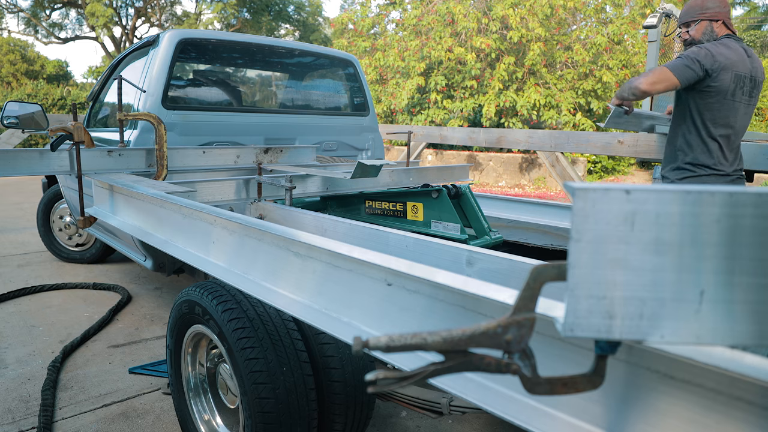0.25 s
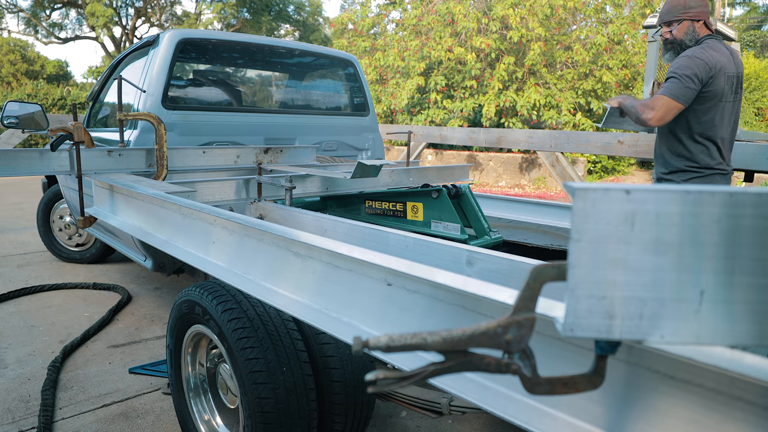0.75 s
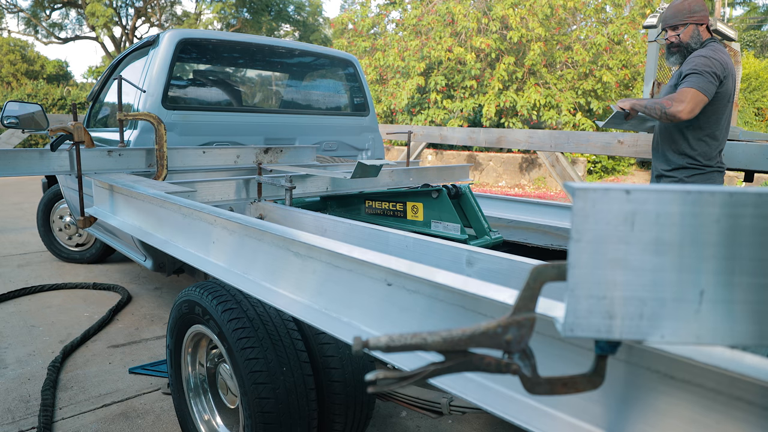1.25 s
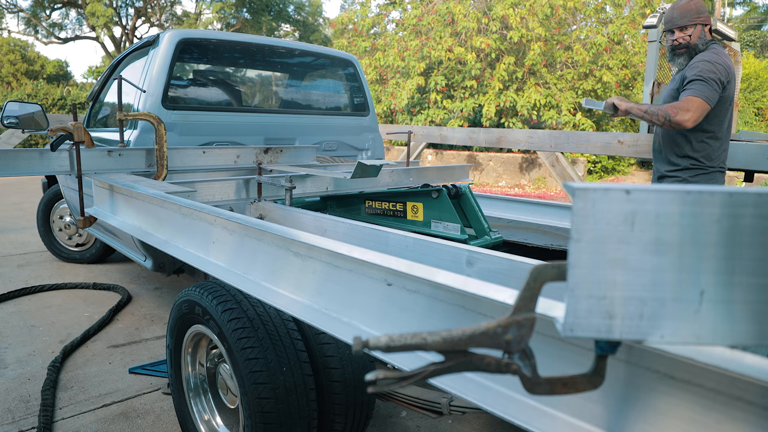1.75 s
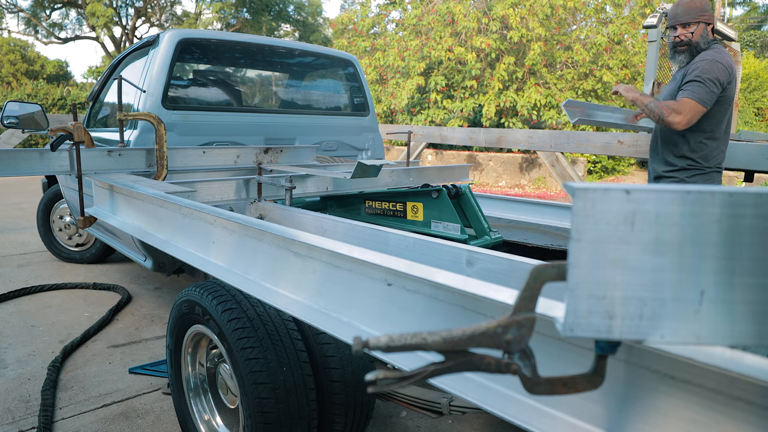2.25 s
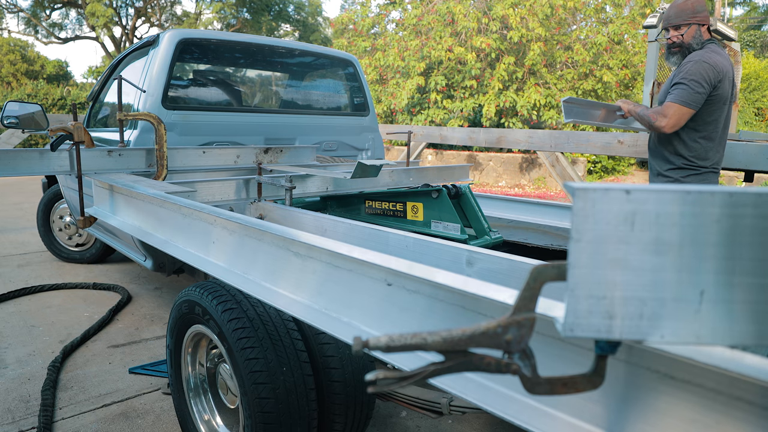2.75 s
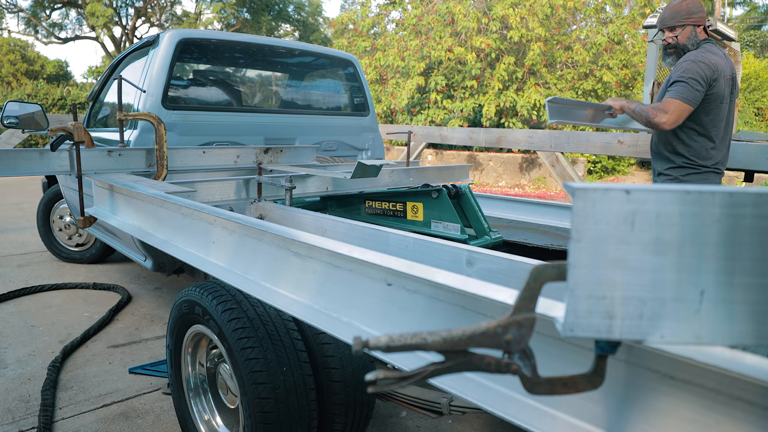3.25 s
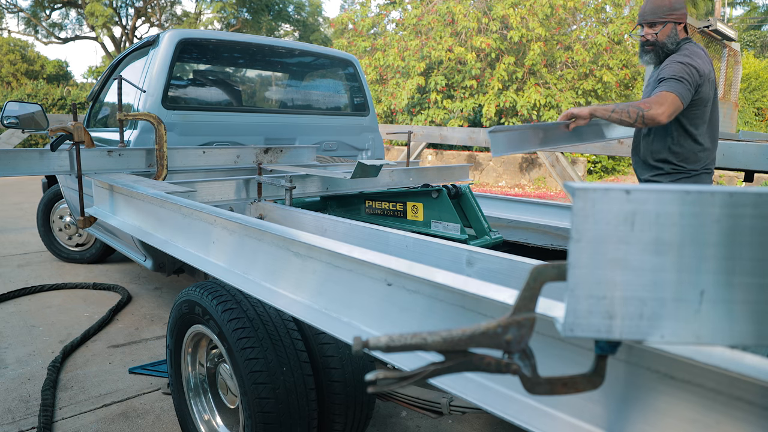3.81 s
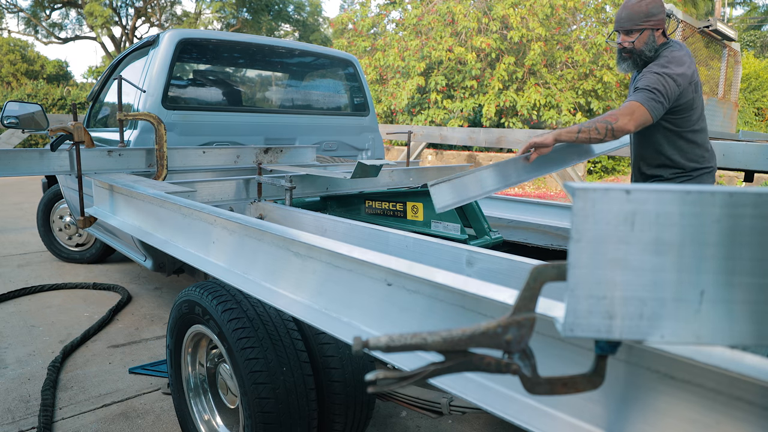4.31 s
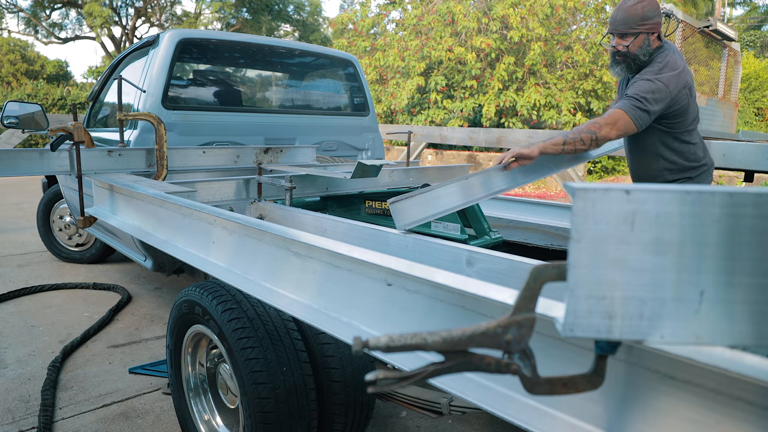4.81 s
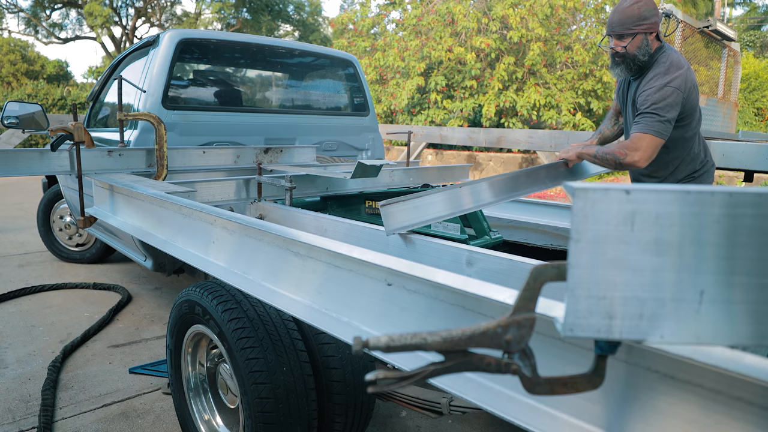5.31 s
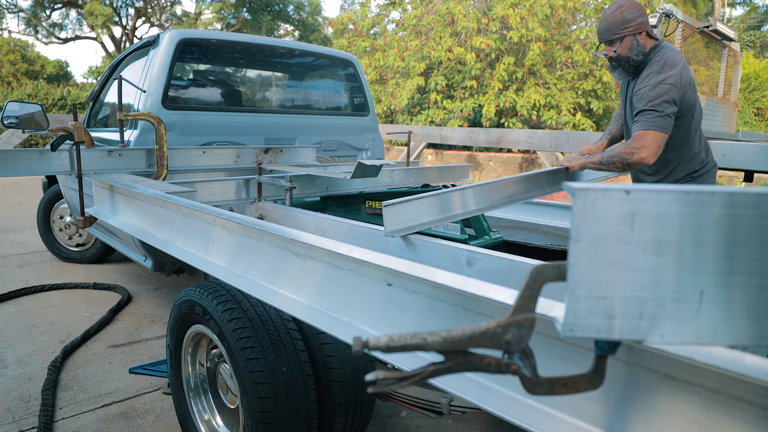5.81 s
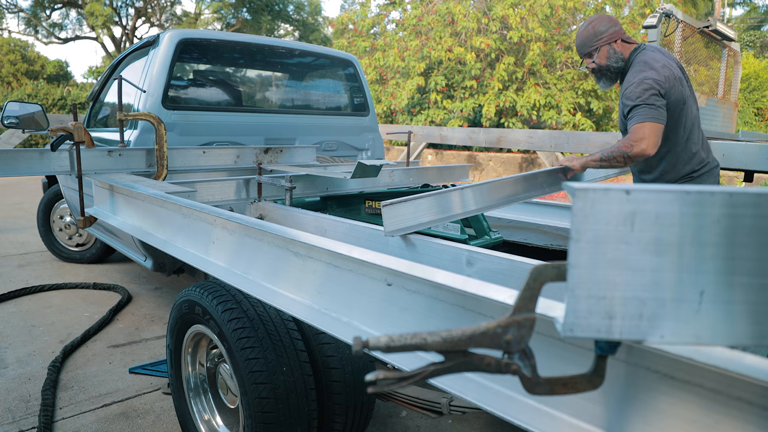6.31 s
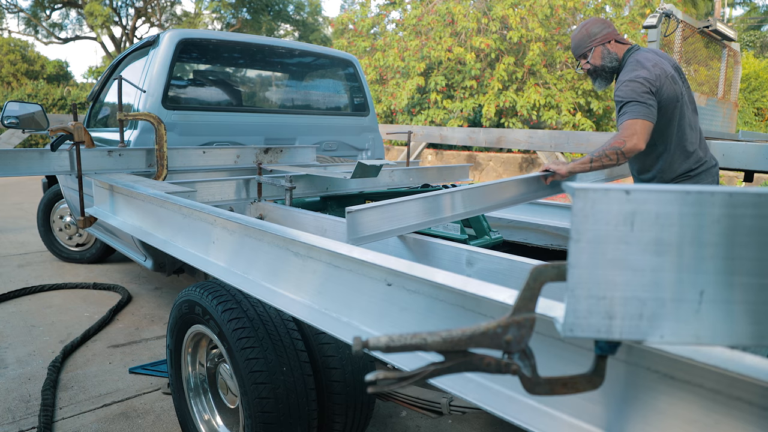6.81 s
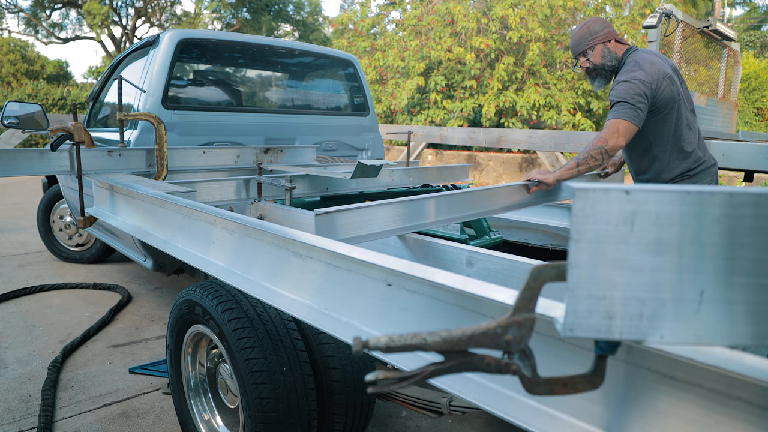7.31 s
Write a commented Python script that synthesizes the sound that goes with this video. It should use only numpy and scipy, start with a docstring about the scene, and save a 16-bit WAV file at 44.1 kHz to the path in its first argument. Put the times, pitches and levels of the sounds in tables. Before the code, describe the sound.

Outdoors over a soft low rumble, an aluminium channel is rubbed and knocked in the hands with short, damped metallic taps. A distant bird gives faint falling whistles. The channel then lands on a truck bed frame with bright, loud clanks and skids, pauses, is dragged with a groaning rasp, and ends on a sharp double knock. One mono microphone, fairly close, open air.

```python
"""A low outdoor rumble and the rub of metal come first: in an open yard a length of aluminium channel
is turned in the hands, scraped and knocked; then a distant bird whistles short falling glides before the
channel is lowered onto a truck's metal bed frame, and once more after it lands. On the frame the channel
clanks, skids, and is dragged into place. Metal is random tiny contacts convolved with decaying modes over
a noise wash; the yard is coloured noise and the bird is gliding sines with a noise tail."""
import sys
import numpy as np
from scipy import signal
from scipy.fft import rfft, irfft
from scipy.io import wavfile

SR = 44100
rng = np.random.default_rng(int(sys.argv[2]) if len(sys.argv) > 2 else 0)


def output_pcm(signal):
    """Save a mono or channel-first signal as 16-bit PCM at the path in sys.argv[1].

    Samples are clipped to [-1, 1] before scaling.
    """
    pcm = np.clip(np.atleast_2d(signal).T, -1, 1) * 32767
    wavfile.write(sys.argv[1], SR, np.round(pcm).astype(np.int16))


N = 333396
TIME = np.arange(N) / SR
RING_TIME = TIME[:SR]
BLOW_TIME = TIME[:SR // 4]
BLOW_GAIN = np.sqrt(SR / 20)   # blow levels refer to the rms over a twentieth of a second


def from_db(db):
    """Decibels to gain."""
    return 10 ** (np.asarray(db) / 20)


def unit_energy(x):
    """Scale so that the squares sum to one."""
    return x / np.sqrt(np.sum(x ** 2) + 1e-20)


def rms_one(x):
    """Scale to an rms of one."""
    return unit_energy(x) * np.sqrt(len(x))


def cut(x, hz, kind, order=2):
    """Causal low- or high-pass."""
    sections = signal.butter(order, min(hz, SR / 2 - 2000), kind, fs=SR, output="sos")
    return signal.sosfilt(sections, x + 1e-18)


def resonate(x, hz, width_hz):
    """One resonance with a gain of one on top."""
    return signal.lfilter(*signal.iirpeak(hz, hz / width_hz, fs=SR), x)


def dying(t60):
    """Envelope of a ring that loses 60 dB in t60 seconds."""
    return np.exp(-np.log(1000) * RING_TIME / t60)


def wander(along, step):
    """Random values one step apart, joined by lines."""
    knots = rng.standard_normal(2048)
    return np.interp(along / step, np.arange(len(knots)), knots)


def add(track, s, sound):
    """Mix a sound into a track at time s."""
    start = max(round(s * SR), 0)
    track[start:start + len(sound)] += sound[:max(N - start, 0)]


def coloured_noise(spectrum, size, ripple_db=0):
    """Noise with the given spectrum; ripple clumps its treble into narrow peaks."""
    hz = np.maximum(np.fft.rfftfreq(size, 1 / SR), 1)
    points_hz, points_db = np.transpose(spectrum)
    level = np.interp(np.log(hz), np.log(points_hz), points_db)
    level = level + ripple_db * np.tanh(wander(hz, 35)) * np.minimum(hz / 5000, 1)
    return rms_one(irfft(rfft(rng.standard_normal(size)) * from_db(level), size))


# Spectral shape of the yard background: freq_hz [Hz], density_db [relative dB per Hz]
YARD_SPECTRUM = [(12, -31), (20, -13.5), (70, 0.5), (175, -7.5), (207, -15), (245, -6), (306, -15),
                 (372, -13), (565, -16), (614, -15), (1010, -17), (1670, -25), (3450, -22), (5700, -31.5),
                 (15500, -44)]
YARD_LEVEL_DB = -53


def yard():
    """Outdoor rumble and hiss: coloured noise whose level wanders slightly."""
    level_db = YARD_LEVEL_DB + .5 * wander(TIME, 0.211)
    return from_db(level_db) * coloured_noise(YARD_SPECTRUM, N)


def mode_ring(hz, t60):
    """One decaying mode with unit energy."""
    return unit_energy(np.sin(2 * np.pi * hz * RING_TIME) * dying(t60))


def body(modes, wash, wash_db, low_t60, high_t60, ripple_db, spread_s):
    """Response to a click: clear modes over a crowd of weak ones."""
    clear = sum(from_db(db) * rng.choice([-1, 1]) * mode_ring(hz, t60) for hz, db, t60 in modes)
    crowd = coloured_noise(wash, SR, ripple_db)
    low = cut(crowd, 1630, "low", order=3) * dying(low_t60)
    high = cut(crowd, 1420, "high", order=3) * dying(high_t60)
    swell = 1 - np.exp(-RING_TIME / spread_s)   # bending waves take a moment to fill the length
    return swell * (clear + from_db(wash_db) * unit_energy(low + high))


# Extra damping by the hands, joined by lines: time_s [s], t60_s [s]
HAND_DAMPING = [(0, 0.9), (.94, 0.67), (1.5, 3.6), (1.8, 1.2), (7.5, 8.7)]


def gripped(response, s):
    """The ring of a body as the hands damp it at time s, scaled to unit energy."""
    return unit_energy(response * dying(np.interp(s, *np.transpose(HAND_DAMPING))))


def grains(size, per_s, spread_db):
    """Tiny contacts at random moments, of uneven strength."""
    touching = rng.random(size) < per_s / SR
    strength_db = spread_db * np.minimum(rng.exponential(1, size), 4)
    return touching * rng.choice([-1, 1], size) * from_db(strength_db)


def contact_tone(force, thud_db, bite_db):
    """The weight behind a contact sets its bass; the sharpness of the edge sets its treble."""
    bass_hz = 350
    low = cut(cut(force, bass_hz, "low"), bass_hz, "low")
    rest = cut(cut(force, bass_hz, "high"), bass_hz, "high")
    middle = cut(cut(rest, 1164, "low"), 1164, "low")
    high = cut(cut(rest, 1390, "high"), 1390, "high")
    return from_db(thud_db) * low + middle + from_db(bite_db) * high


def moving_contact(force, end_echo):
    """Slips also return from the near end; the delay wanders as the contact travels, shifting the tone."""
    sample = np.arange(len(force))
    delay_s = 0.001236 * from_db(3 * wander(sample / SR, .08))
    returned = np.interp(sample - np.round(delay_s * SR), sample, force)
    return (force + end_echo * returned) / np.hypot(1, end_echo)


def scrape(pressure, thud_db, bite_db, response, slips_per_s, spread_db, judder_db, grit_db):
    """Metal catches and slips on metal: dense clicks under a juddering pressure, with fine grit on top."""
    size = len(pressure)
    judder = from_db(judder_db * wander(TIME[:size], .012))
    slips = rms_one(grains(size, slips_per_s, spread_db) * judder)
    slips = moving_contact(slips, end_echo=0.34)
    slips = slips + from_db(grit_db) * cut(slips, 6500, "high", order=1)
    force = pressure * contact_tone(slips, thud_db, bite_db)
    return signal.fftconvolve(force, response)[:N]


def strokes(rows, response, attack_s, release_db_per_s, **friction):
    """Each stroke bites in, swells or sags while it lasts, and lets go."""
    out = np.zeros(N)
    for s, length, db, swell_db_per_s, thud_db, bite_db in rows:
        swell = swell_db_per_s * np.minimum(RING_TIME, length)
        release = release_db_per_s * np.maximum(RING_TIME - length, 0)
        pressure = np.minimum(RING_TIME / attack_s, 1) * from_db(db + swell - release)
        add(out, s, scrape(pressure, thud_db, bite_db, gripped(response, s), **friction))
    return out


# Strokes along the held channel: start_s [s], length_s [s], level_db [dB before tone shaping],
# swell_db_per_s [dB/s], thud_db [bass gain, dB], bite_db [treble gain, dB]
RUB_STROKES = [(0.005, .21, -44.5, -2.5, 8, 6), (1.462, 0.097, -36, 5, -4, -7.5),
               (1.62, 0.092, -41, 6, -0.5, -8.5), (1.99, .27, -43, 12.5, 6, -1.5),
               (2.37, 0.096, -42.5, 20, 5.5, -7), (2.56, 0.04, -60.5, 0, 23, -2),
               (3.22, 0.13, -40.5, 44, -12, -7.5), (3.37, 0.18, -38, 5, -18, -1.5),
               (3.63, 0.17, -48.5, 21, 8, -1.5)]


def rubs(response):
    """Stick-slip strokes along the channel in the hands."""
    return strokes(RUB_STROKES, response, attack_s=0.011, release_db_per_s=170,
                   slips_per_s=1000, spread_db=4.5, judder_db=0, grit_db=-0.5)


def blow(response, s, db, thud_db, bite_db, contact_hz, chatter_s, first_touch_db, rattle_per_s):
    """A first touch and a burst of chatter set the body ringing, damped by the grip."""
    chatter_envelope = np.exp(-(BLOW_TIME / chatter_s) ** 2)
    burst = unit_energy(grains(len(BLOW_TIME), rattle_per_s, 3.97) * chatter_envelope)
    burst[0] += from_db(first_touch_db)
    shaped = contact_tone(unit_energy(burst), thud_db, bite_db)
    force = from_db(db) * cut(shaped, contact_hz, "low")
    return BLOW_GAIN * signal.fftconvolve(force, gripped(response, s))


# Bright catches of a sliding edge: start_s [s], level_db [dB before tone shaping]
EDGE_TICKS = [(0.014, -53), (0.080, -50), (0.170, -50), (1.916, -41.5), (2.015, -45.5), (2.070, -46),
              (2.142, -49), (2.221, -50), (2.440, -48), (3.780, -51.5), (4.809, -36), (4.912, -43.5),
              (5.303, -41), (5.339, -45), (5.381, -38.5), (5.440, -41.5), (5.750, -40)]
TICK_THUD_DB, TICK_BITE_DB, TICK_GRIT_DB = 5.5, 8.5, 0.5
TICK_CONTACT_HZ, TICK_CHATTER_S = 13700, .006
LANDING_S = 4.7   # the channel is in the hands before this, on the frame after it


def ticks(response, landed):
    """Light, sharp catches of an edge, before or after the landing."""
    out = np.zeros(N)
    gritty = response + from_db(TICK_GRIT_DB) * cut(response, 4700, "high", order=1)
    for s, db in EDGE_TICKS:
        if (s > LANDING_S) == landed:
            tick = blow(gritty, s, db, TICK_THUD_DB, TICK_BITE_DB, TICK_CONTACT_HZ, TICK_CHATTER_S,
                        first_touch_db=-0.5, rattle_per_s=1800)
            add(out, s, tick)
    return out


def favoured_ring(modes, near_hz, db):
    """The spot that is hit favours one mode."""
    hz, _, t60 = min(modes, key=lambda mode: abs(mode[0] - near_hz))
    return BLOW_GAIN * from_db(db) * mode_ring(hz, t60)


# Clear modes of the hand-held channel: pitch_hz [Hz], energy_db [relative dB], t60_s [s before the grip]
CHANNEL_CLEAR_MODES = [(179.3, -18, 0.16), (230.7, -24.5, 1), (282, -18, 0.2), (433.8, -12, 0.19),
                       (652, -11.5, 0.52), (880.7, -12.5, 0.26), (1151.5, -10.5, 0.58), (1163.6, -9, 0.1),
                       (1435, -13, 0.08), (1540, -21, 0.047), (1630, -15.5, 0.22), (1673, -19.5, 0.28),
                       (1726, -20, 0.26), (1842, -16, 0.2), (2034, -38, 1), (2274, -18.5, 0.46),
                       (2250, -50, 0.19), (2450, -43, 0.081), (2490, -18.5, 0.27), (2695, -22.5, 0.18),
                       (2840, -17.5, 0.19), (3055, -18.5, 0.25), (3180, -18, 0.048), (3240, -23, 0.79),
                       (3510, -18.5, 0.24), (3630, -16, 0.067), (3810, -23, 0.26), (4100, -23, 0.26),
                       (4280, -25, 0.42), (4863, -42, 0.2)]
# Knocks on the held channel: start_s [s], level_db [dB before tone shaping], thud_db [bass gain, dB],
# bite_db [treble gain, dB], chatter_s [s], favoured_hz [nearest mode, Hz], share_db [that mode, dB re level]
HAND_KNOCKS = [(0.879, -33, 6.5, -6.5, 0.1, 893, -19), (0.940, -22.5, -0.5, 2, 0.039, 1172, -25),
               (1.003, -31.5, 2.5, 0, 0.0099, 1172, -15), (1.470, -44, 4.5, 3, 0.0051, 3055, -5),
               (1.589, -32, 3, -3.5, 0.006, 1144, -34), (1.817, -27, 12, -10, 0.013, 652, 1),
               (1.936, -31, 9.5, -6.5, 0.072, 446, -9), (2.320, -30.5, 1, 5, 0.0086, 652, -4),
               (2.398, -35.5, -2, -7, 0.017, 1144, -13), (2.525, -31.5, -19, -3.5, 0.0029, 1399, -20),
               (2.606, -45.5, 11, -4, 0.026, 1172, -8.5), (3.163, -41.5, -3, -8, 0.039, 1144, -4),
               (3.350, -43, -16, 3, .06, 893, -0.5), (3.579, -38, 2, -1.5, .008, 1144, 4.5),
               (3.778, -37, -1.5, -11, 0.007, 444, -11)]
KNOCK_CONTACT_HZ, KNOCK_TYPICAL_DB = 7500, -32   # contact cut-off of a knock at the typical level plus bite
DB_PER_OCTAVE = 10   # extra level plus bite that raises the cut-off an octave


def knocks(response):
    """Harder, sharper knocks have a shorter contact, so they reach higher."""
    out = np.zeros(N)
    for s, db, thud_db, bite_db, chatter_s, mode_hz, share_db in HAND_KNOCKS:
        octaves = (db + bite_db - KNOCK_TYPICAL_DB) / DB_PER_OCTAVE
        contact_hz = max(KNOCK_CONTACT_HZ * 2 ** octaves, 4000)
        knock = blow(response, s, db, thud_db, bite_db, contact_hz, chatter_s,
                     first_touch_db=-3.5, rattle_per_s=1800)
        add(out, s, knock)
        add(out, s, favoured_ring(CHANNEL_CLEAR_MODES, mode_hz, db + share_db))
    return out


# Crowd of weaker channel modes: freq_hz [Hz], density_db [relative dB per Hz]
CHANNEL_CROWD = [(29, -31), (50, -10), (385, -3.5), (444, -12.5), (578, -4.5), (637, -6), (1050, -6.5),
                 (1160, -2.5), (1310, -6), (3580, -15), (15500, -46)]


def held_channel():
    """The channel rings in the hands as it is rubbed, ticked and knocked."""
    response = body(CHANNEL_CLEAR_MODES, CHANNEL_CROWD, wash_db=-2.5, low_t60=0.4, high_t60=0.34,
                    ripple_db=2, spread_s=0.00062)
    return rubs(response) + ticks(response, landed=False) + knocks(response)


# Bird notes: start_s [s], length_s [s], pitch_hz [at the start before flutter, Hz], level_db [dry peak, dB]
BIRD_NOTES = [(3.933, 0.029, 3960, -49), (3.967, 0.022, 3170, -55), (4.152, 0.037, 3180, -57),
              (4.188, 0.083, 2450, -60), (4.387, 0.071, 3700, -56), (4.44, 0.078, 3900, -59),
              (4.64, .04, 2500, -60), (5.941, 0.02, 2660, -59)]
CHIRP_FALL_OCTAVES_PER_S, CHIRP_ARCH = 3.1, 0.0287   # arch: fraction of the pitch


def bird():
    """Short whistled glides with a slight flutter, blurred by the trees."""
    song = np.zeros(N)
    for s, length, start_hz, db in BIRD_NOTES:
        age = TIME[:round(length * SR)]
        arch = np.sin(np.pi * age / length)
        fall = 2 ** (-CHIRP_FALL_OCTAVES_PER_S * age)
        flutter = .025 * wander(age, 0.00374)
        hz = start_hz * fall * (1 + CHIRP_ARCH * arch + flutter)
        add(song, s, from_db(db) * arch * np.sin(2 * np.pi * np.cumsum(hz) / SR))
    trees = unit_energy(rng.standard_normal(SR) * dying(0.33))
    return song + from_db(-1.0) * signal.fftconvolve(song, trees)[:N]


# Clear modes of the channel resting on the bed frame: pitch_hz [Hz], energy_db [relative dB],
# t60_s [s before further damping]
FRAME_CLEAR_MODES = [(82.9, -14, 1.25), (109, -17, 0.32), (199.7, -14.5, 0.2), (296, -29, 0.46),
                     (400, -16.5, 0.063), (452, -28, 0.42), (488, -22.5, 0.22), (565, -10.5, 0.6),
                     (649, -17, 0.4), (632, -31, 0.18), (753, -14, 0.21), (795, -32, 0.88),
                     (877, -17, 0.67), (1000, -32, 0.21), (1008.7, -11.5, 0.43), (1125, -14, 0.06),
                     (1226, -16.5, 0.19), (1340, -21, 0.15), (1435, -18, 0.44), (1600, -34, 0.078),
                     (1737, -31, 0.53), (2060, -53, 0.1), (1963, -28, 0.15), (2923, -16.5, 0.28),
                     (3500, -18, 0.095), (3768, -17, 0.05)]
# Clanks on the frame: start_s [s], level_db [dB before tone shaping], thud_db [bass gain, dB],
# bite_db [treble gain, dB], contact_hz [low-pass cut-off, Hz], chatter_s [s], favoured_hz [nearest mode, Hz]
FRAME_CLANKS = [(4.778, -18.5, -3, 0, 10400, 0.015, 445), (4.810, -25.5, 1, 1.5, 11300, 0.021, 753),
                (5.173, -27, -3, -10, 6800, 0.029, 753), (5.336, -28, 0, .5, 11000, 0.023, 561),
                (5.601, -13, -5.5, -5, 9900, 0.048, 753), (5.660, -21.5, -12, 2, 10700, 0.067, 795),
                (6.622, -31, -19, 2, 5000, .005, 1970), (7.523, -17, -13, -6, 3500, 0.003, 885),
                (7.529, -16, -11.5, -0.5, 3240, 0.0092, 1140)]
CLANK_RING_DB = -7.5   # favoured mode against the clank's level


def clanks(response):
    """Blows of the channel on the frame, each favouring one mode."""
    out = np.zeros(N)
    for s, db, thud_db, bite_db, contact_hz, chatter_s, mode_hz in FRAME_CLANKS:
        clank = blow(response, s, db, thud_db, bite_db, contact_hz, chatter_s,
                     first_touch_db=-1.5, rattle_per_s=1200)
        add(out, s, clank)
        add(out, s, favoured_ring(FRAME_CLEAR_MODES, mode_hz, db + CLANK_RING_DB))
    return out


# Skids on the frame after landing: start_s [s], length_s [s], level_db [dB before tone shaping],
# swell_db_per_s [dB/s], thud_db [bass gain, dB], bite_db [treble gain, dB]
FRAME_SKIDS = [(4.82, 0.12, -33.5, -17, 10, -7), (4.99, .3, -43.5, 15, 8.5, -11.5),
               (5.303, .21, -29.5, -55, 9.5, -6), (5.66, 0.25, -32, -73, 12, -10)]


def skids(pressed):
    """Stick-slip strokes of the channel on the frame."""
    return strokes(FRAME_SKIDS, pressed, attack_s=0.009, release_db_per_s=132,
                   slips_per_s=1000, spread_db=2, judder_db=1.0, grit_db=0.0)


# The weight comes onto the frame and the channel slows over this span; pairs are values at its start and end.
DRAG_SPAN_S = (6.55, 7.25)
DRAG_THUD_DB, DRAG_BITE_DB = (-8, 8.5), (-5.5, 2)
GROAN_PER_S, GROAN_DB = (205, 100), (-0.5, 5.5)   # kicks per second; level against the effort
BOOM_DB = (-23, 2.5)   # level against the effort
BOOM_HZ, BOOM_WIDTH_HZ = 107.2, 7.9   # the frame's low sway


def along_drag(start_and_end):
    """A value that moves evenly from the start of the drag span to its end."""
    return np.interp(TIME, DRAG_SPAN_S, start_and_end)


def groans(effort, response, jitter, patchy_db):
    """Slips in step, one kick per cycle, slower as the channel slows and patchy in strength."""
    rate = along_drag(GROAN_PER_S) * (1 + jitter * wander(TIME, 0.0042) + .08 * wander(TIME, .06))
    cycles = np.floor(np.cumsum(rate) / SR)
    kicks = rms_one(np.diff(cycles, prepend=0))
    patches_db = patchy_db * np.tanh(wander(TIME, 0.066))
    strength = effort * from_db(along_drag(GROAN_DB) + patches_db)
    return signal.fftconvolve(strength * kicks, unit_energy(response))[:N]


def frame_boom():
    """Random contacts through two equal resonances make the frame's low sway."""
    sway = resonate(grains(N, 1000, 2), BOOM_HZ, BOOM_WIDTH_HZ)
    return rms_one(resonate(sway, BOOM_HZ, BOOM_WIDTH_HZ))


# Effort of the long drag, joined by lines: time_s [s], effort_db [dB before DRAG_DB]
DRAG_EFFORT = [(6.47, -63), (6.538, -31.5), (6.636, -35), (6.646, -24), (6.692, -25.5), (6.784, -26),
               (6.808, -35), (6.886, -26.5), (6.902, -39), (6.93, -28), (7.302, -42.5), (7.5, -84)]
DRAG_DB = -5.5


def drag(pressed, spring):
    """One long pull: it rasps and groans with the effort, and the frame booms as it takes the weight."""
    effort_db = np.interp(TIME, *np.transpose(DRAG_EFFORT), left=-np.inf, right=-np.inf)
    effort = from_db(DRAG_DB + effort_db)
    rasp = scrape(effort, along_drag(DRAG_THUD_DB), along_drag(DRAG_BITE_DB), pressed + spring,
                  slips_per_s=900, spread_db=2.0, judder_db=1.5, grit_db=0.5)
    boom = effort * from_db(along_drag(BOOM_DB)) * frame_boom()
    return rasp + boom + groans(effort, spring * dying(0.13), jitter=0.03425, patchy_db=5)


# Crowd of weaker modes of channel and frame: freq_hz [Hz], density_db [relative dB per Hz]
FRAME_CROWD = [(18, -39), (30, -17), (75, -18), (263, -11), (443, -2.5), (656, -3.5), (767, -4.5),
               (1080, -7.5), (1170, -6.5), (2690, -14.5), (3780, -15), (4910, -27), (15500, -50.5)]


def channel_on_frame():
    """Channel and frame ring together, with modes reaching lower than the channel alone."""
    response = body(FRAME_CLEAR_MODES, FRAME_CROWD, wash_db=2.5, low_t60=0.36, high_t60=0.23,
                    ripple_db=1.5, spread_s=0.0003)
    pressed = response * dying(2.06)   # sliding under load damps the ring
    spring = resonate(pressed, hz=484, width_hz=255)   # the springy contact grinds around one pitch
    return clanks(response) + ticks(response, landed=True) + skids(pressed) + drag(pressed, spring)


def scene():
    """All sources mixed to one channel."""
    return (yard() + held_channel() + bird() + channel_on_frame())[None]


def record(dry):
    """A steep low-pass removes the top of the treble."""
    cutoff_hz = 15700
    return signal.sosfilt(signal.ellip(10, .1, 80, cutoff_hz, fs=SR, output="sos"), dry)


dry = scene()
out = record(dry)
output_pcm(out)
```